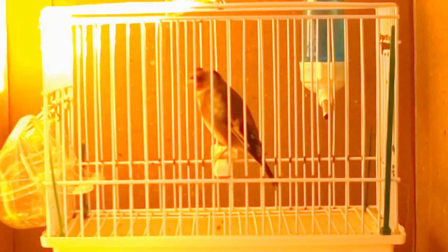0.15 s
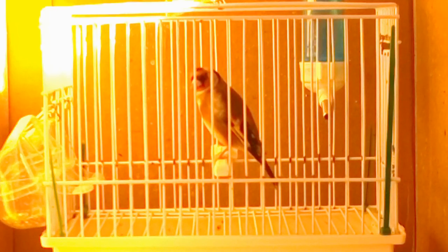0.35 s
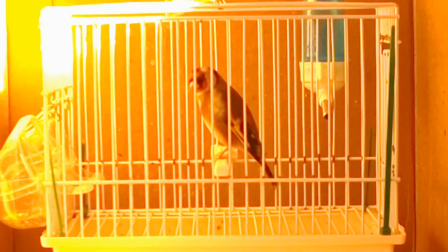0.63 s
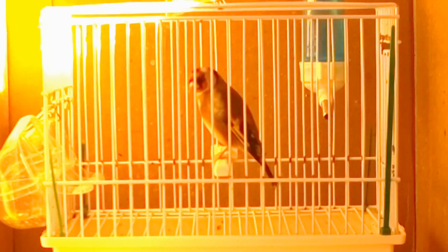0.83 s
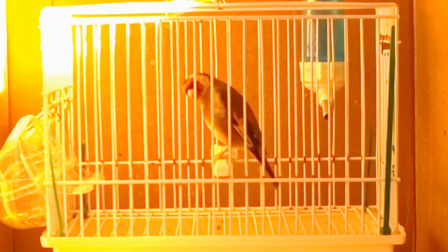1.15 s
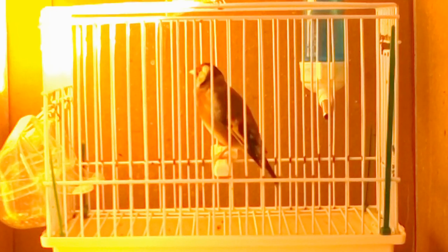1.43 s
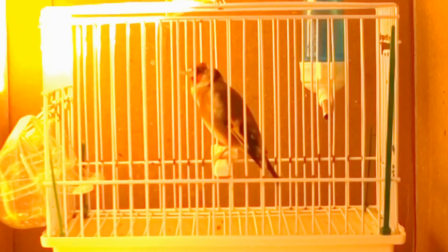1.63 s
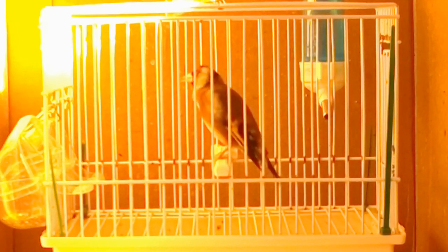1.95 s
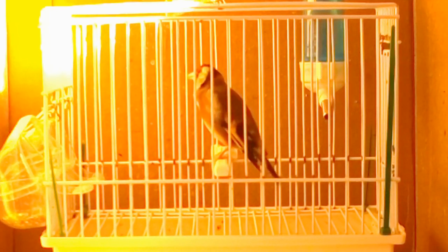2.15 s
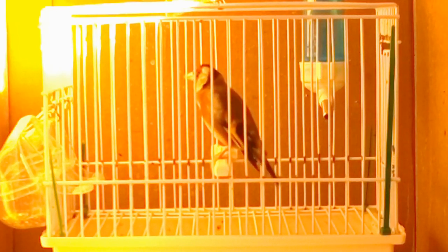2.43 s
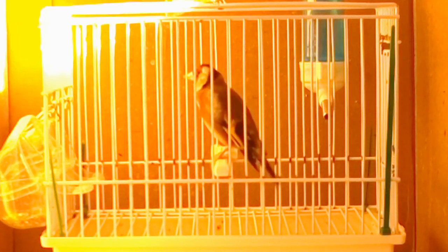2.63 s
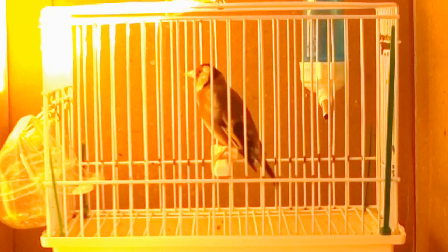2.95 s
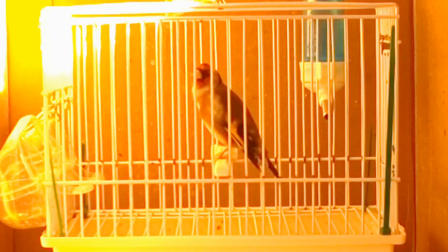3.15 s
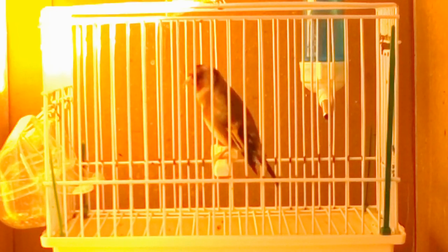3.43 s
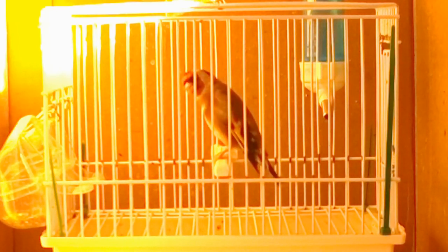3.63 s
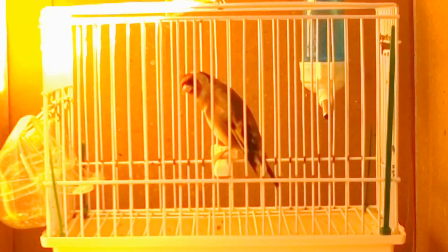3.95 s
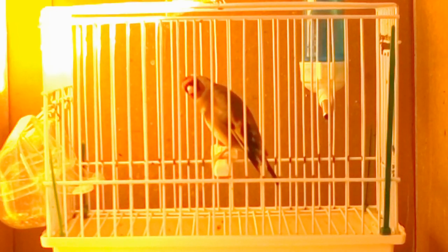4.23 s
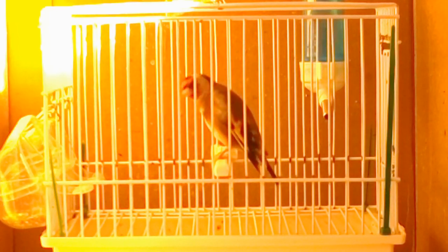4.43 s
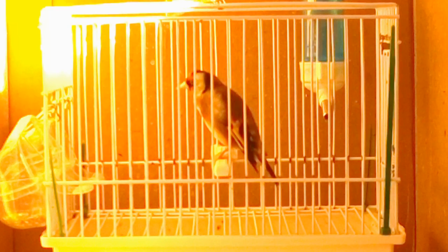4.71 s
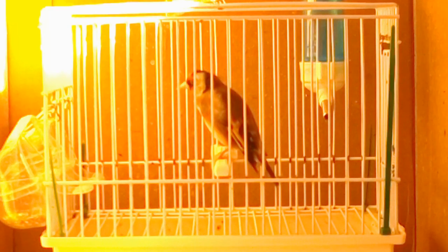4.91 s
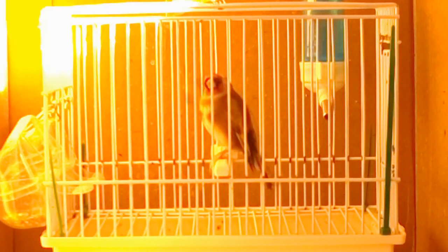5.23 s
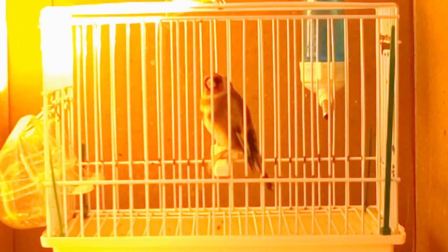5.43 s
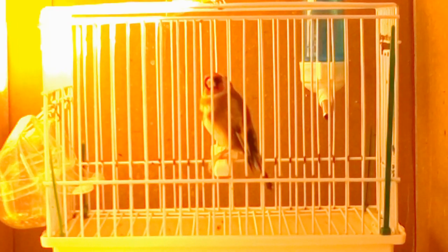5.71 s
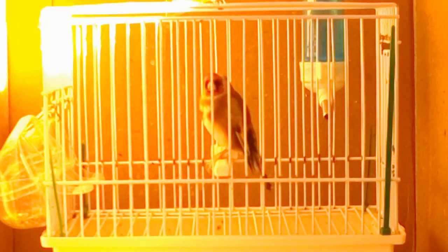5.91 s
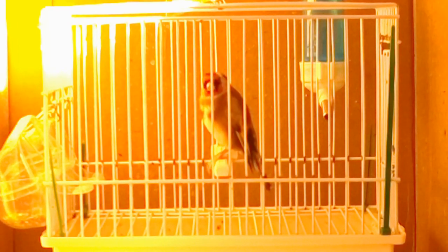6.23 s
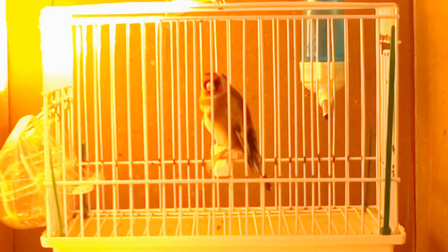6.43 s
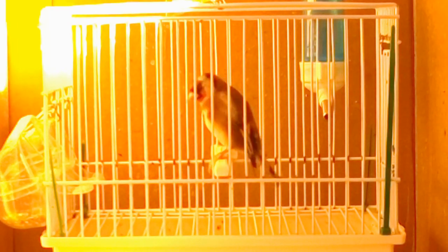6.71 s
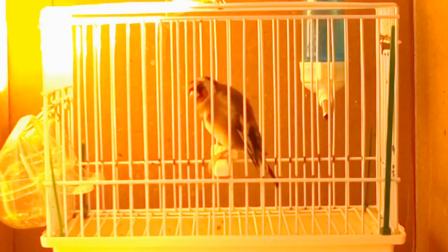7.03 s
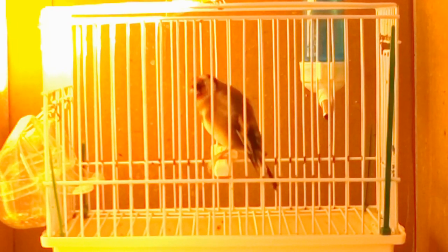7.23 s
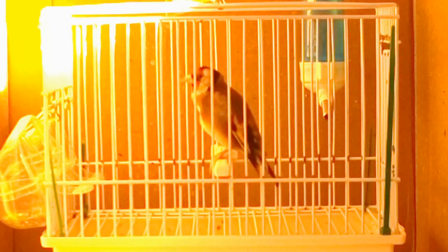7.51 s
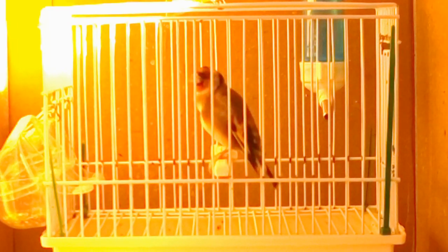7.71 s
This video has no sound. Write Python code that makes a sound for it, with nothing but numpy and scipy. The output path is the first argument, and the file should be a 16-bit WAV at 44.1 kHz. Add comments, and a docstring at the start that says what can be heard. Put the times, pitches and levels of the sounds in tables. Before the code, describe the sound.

A small songbird twitters loudly up close in an echoing room, pausing while distant birds chirp softly over a faint hum.

```python
"""A caged goldfinch sings in a hard-walled room, over steady room noise and a low hum. After a few far-off
chirps it opens with two two-voiced slurs, runs through swoops and upslurs and ends on a falling buzz. In the
pause, distant birds chirp and one whistles a see-saw; then the finch returns with a short phrase. Each syllable
is made of gliding whistles from the syrinx, smeared by the room, and the loudest ones flatten at their peaks."""
import sys
import numpy as np
from scipy import signal
from scipy.fft import rfft, irfft, next_fast_len
from scipy.io import wavfile
from scipy.ndimage import uniform_filter1d, map_coordinates

SR = 44100
rng = np.random.default_rng(int(sys.argv[2]) if len(sys.argv) > 2 else 0)


def bounce(signal):
    """Save signal as a 16-bit WAV file at the path given by the first command-line argument."""
    frames = np.transpose(np.atleast_2d(signal))
    limited = np.clip(frames, -1, 1)
    pcm = np.round(limited * 32767).astype(np.int16)
    wavfile.write(sys.argv[1], SR, pcm)


N = 347067
TREBLE_LIMIT_HZ = 12600
# faint partials of a clean bird whistle: (multiple of the pitch, level [dB])
OVERTONES = [(2, -36.5), (3, -37)]


def amp(db):
    """Decibels to gain."""
    return 10 ** (np.asarray(db) / 20)


def unit(x):
    """Scale to an rms of 1."""
    return x / np.sqrt(np.mean(x ** 2) + 1e-20)


def along(points, hz):
    """Read a curve of (frequency [Hz], value) points on a log frequency axis."""
    freqs, values = np.transpose(points)
    return np.interp(np.log(hz + 1), np.log(freqs + 1), values)


def wobble(rate, size):
    """A smooth random curve with `rate` knots a second."""
    knots = rng.standard_normal(int(size * rate / SR) + 4)
    return map_coordinates(knots, [np.arange(size) * rate / SR])


def ease(u, start, end, bend):
    """From start to end as u goes 0 to 1: a positive bend moves early, a negative one late."""
    return start + (end - start) * np.expm1(-bend * u) / np.expm1(-bend)


def swell(t, attack_s, release_s, depth_db=16):
    """An attack, hold and release envelope in dB."""
    attack = np.clip(1 - t / attack_s, 0, 1) ** 2
    release = np.clip(1 - (t[-1] - t) / release_s, 0, 1) ** 2
    return -depth_db * (attack + release)


def filtered(x, response):
    """Equalise x with a gain that is a function of frequency."""
    size = next_fast_len(N + SR // 2)
    return irfft(rfft(x, size) * response(np.fft.rfftfreq(size, 1 / SR)), size)[:N]


def noise(spectrum):
    """Noise of rms 1, coloured by (frequency [Hz], relative level [dB]) points."""
    white = rng.standard_normal(N)
    return unit(filtered(white, lambda hz: amp(along(spectrum, hz)) * (hz < TREBLE_LIMIT_HZ)))


def add(track, s, sound):
    """Mix a sound into the track at time s."""
    part = track[round(s * SR):][:len(sound)]
    part += sound[:len(part)]


def hum(gain_db=-2, waver=0.68):
    """Steady hum tones, each wavering in level and phase."""
    # hum tones: (frequency [Hz], relative level [dB])
    tones = [(242.2, -43.5), (285.3, -49), (689.1, -47.5), (759.0, -51), (915.2, -47), (969.0, -47),
             (1545, -53), (1599, -59)]
    track, t = np.zeros(N), np.arange(N) / SR
    for hz, db in tones:
        drift = 1 + waver * (wobble(9, N) + 1j * wobble(9, N))
        track += amp(db) * unit(np.real(drift * np.exp(2j * np.pi * hz * t)))
    return amp(gain_db) * track


def room_tone(gain_db=1.0):
    """A dark bed of noise whose level dips briefly about five seconds in."""
    # colour of the bed: (frequency [Hz], relative level [dB])
    spectrum = [(41, -27), (75, -21), (92, -24), (127, -5.5), (195, -8.5), (240, -4), (290, -4.5),
                (560, -5.5), (950, -6.5), (1150, -9), (2500, -17), (5400, -21), (8200, -23), (11000, -35)]
    # its fader curve: (time [s], relative level [dB])
    fader = [(0, -35), (4.95, -35), (5.1, -39.5), (5.3, -37), (5.6, -35.5), (7.87, -35.5)]
    level_db = np.interp(np.arange(N) / SR, *np.transpose(fader))
    return amp(level_db + gain_db) * noise(spectrum)


def rumble(floor_db=-70, bump_s=0.072):
    """A very faint rumble that swells into soft low bumps."""
    # colour of the rumble: (frequency [Hz], relative level [dB])
    spectrum = [(12, -24.5), (28, 1), (50, 2), (80, -6), (130, -17), (400, -120)]
    # bumps: (time [s], level [dB])
    thuds = [(.15, -53), (.42, -50), (2.06, -49), (3.27, -47), (3.358, -49), (3.54, -50), (4.66, -47),
             (6.48, -54)]
    t = np.arange(N) / SR
    bumps = sum(amp(db) * np.exp(-((t - s) / bump_s) ** 2) for s, db in thuds)
    return (amp(floor_db) + bumps) * noise(spectrum)


def room(x, build_s=0.00074):
    """The walls answer with a dense tail that dies sooner in the treble."""
    # reverb decay: (frequency [Hz], time to fall 60 dB [s])
    decay = [(2000, 0.98), (4000, 0.57), (6500, 0.57), (12000, 0.21)]
    # colour of the tail: (frequency [Hz], relative level [dB])
    colour = [(2200, -5), (3100, -5), (4200, 2), (5500, 1.5), (7000, 7), (11000, 1)]
    hz, t, bands = signal.stft(rng.standard_normal(SR), SR, nperseg=256)
    fade_db = along(colour, hz)[:, None] - 60 * t / along(decay, hz)[:, None]
    build_up = 1 - np.exp(-t / build_s)
    tail = signal.istft(bands * amp(fade_db) * build_up, SR, nperseg=256)[1]
    return signal.fftconvolve(x, tail / np.linalg.norm(tail))[:N]


def near_walls(x, wall_db=-13, count=7):
    """The cage tray and the wall behind it send back a few quick reflections."""
    echoes = np.zeros(N)
    for delay_s in rng.uniform(.002, .022, count):
        add(echoes, delay_s, x)
    return amp(wall_db) * echoes / np.sqrt(count)


def syrinx(hz, db, partials, jitter=0.0029, shimmer_db=2.23, edge_s=.003):
    """A bird's voice: a slightly unsteady whistle with weaker partials and soft ends."""
    n = len(hz)
    phase = 2 * np.pi * np.cumsum(hz * (1 + jitter * wobble(425, n))) / SR
    upper = sum(amp(level) * np.sin(k * phase) * (k * hz < SR / 2) for k, level in partials)
    gain = amp(db + shimmer_db * wobble(273.6, n))
    ends = np.clip(np.minimum(np.arange(n), np.arange(n)[::-1]) / (edge_s * SR), 0, 1)
    return (np.sin(phase) + upper) * gain * np.sin(np.pi / 2 * ends) ** 2


def far_chirps(foot=0.62, bend=6, droop=.2, rasp=0.056, crest=0.37, taper_db=-16):
    """Each distant chirp scoops up toward its top pitch and droops; rasp shakes the pitch."""
    # chirps: (time [s], relative level [dB], top pitch [Hz], length [s])
    calls = [ (0.4, -30, 3735, .045), (0.636, -26.5, 3340, 0.028), (0.758, -28, 3390, 0.0324),
             (.89, -31.5, 3350, 0.0354), (1.261, -29.5, 3500, 0.028), (4.491, -29, 3960, .02),
             (4.552, -27.5, 3740, 0.059), (4.678, -30.5, 3430, 0.063), (4.853, -27.5, 4640, 0.021),
             (6.089, -25.5, 4540, .025), (6.212, -33, 3470, .035), (6.385, -28, 3440, 0.027),
             (6.49, -27.5, 3390, 0.0295), (6.613, -29.5, 3420, .033), (5.967, -48, 8000, .04),
             (6.14, -43.5, 8030, 0.035), (6.32, -47, 8040, .045), (6.492, -42, 7230, .04),
             (7.088, -38, 3970, 0.034), (7.26, -36.5, 4170, 0.033), ]
    track = np.zeros(N)
    for s, db, top_hz, length_s in calls:
        u = np.linspace(0, 1, round(length_s * SR))
        contour = ease(u, foot, 1, bend) - droop * u ** 4
        hz = top_hz * contour * (1 + rasp * wobble(696, len(u)))
        add(track, s, syrinx(hz, db + taper_db * (u - crest) ** 2, OVERTONES))
    return track


def seesaw(gain_db=2, period_s=.179, length_s=0.062, droop=0.0276, low_ratio=.763, low_db=1.5):
    """A distant bird alternates pure high and low notes, each sagging as it swells and fades."""
    # two lone opening notes: (time [s], pitch [Hz], relative level [dB])
    openers = [(5.283, 4450, -40), (5.45, 3745, -42)]
    # bouts: (start [s], end [s], first high note [Hz], last high note [Hz], low note's lag [s],
    # relative level [dB])
    bouts = [(5.639, 6.62, 5537, 5190, 0.089, -40.5), (6.677, 6.95, 6080, 6040, 0.029, -42),
             (7.056, 7.32, 5410, 5510, 0.025, -43.5)]
    notes = list(openers)
    for start, end, first_hz, last_hz, lag, db in bouts:
        beats = np.arange(start, end, period_s)
        high_hz = ease(np.linspace(0, 1, len(beats)), first_hz, last_hz, bend=-2.85)
        for s, hz in zip(beats, high_hz):
            notes += [(s, hz, db), (s + lag, hz * low_ratio, db + low_db)]
    track, u = np.zeros(N), np.linspace(0, 1, round(length_s * SR))
    sag = 1 + droop * (1 - u) ** 4
    arch_db = gain_db - 30 * (u - .4) ** 2
    for s, hz, db in notes:
        add(track, s, syrinx(hz * sag, db + arch_db, partials=[]))
    return track


def treble_hiss(voice, hiss_db=-35, smooth_s=.006):
    """A faint high hiss rises and falls with the loudness of the song."""
    strength = np.sqrt(np.abs(uniform_filter1d(voice ** 2, round(SR * smooth_s))))
    return amp(hiss_db) * strength * noise([(3000, -21.0), (8000, 3), (11500, 2)])


def glide(length_s, start_hz, end_hz, bend, db, attack_s, release_s, partials):
    """One whistle that eases from one pitch to another."""
    t = np.arange(0, length_s, 1 / SR)
    hz = ease(t / length_s, start_hz, end_hz, bend)
    return syrinx(hz, db + swell(t, attack_s, release_s), partials)


def buzz(start_s=3.692, length_s=.251, sweeps_per_s=95, db=-6.5, shut_db=-19, top_db=-6.0):
    """The finch's buzz: rapid upward sweeps that sink in pitch and die away."""
    track, t = np.zeros(N), np.arange(0, length_s, 1 / SR)
    # foot and top of the sweeps, each: (first pitch [Hz], last pitch [Hz], bend)
    foot = (5800, 2590, 1.2)
    top = (6800, 4300, -2)
    low_hz, high_hz = ease(t / length_s, *foot), ease(t / length_s, *top)
    cycle = (t * sweeps_per_s + .05 * wobble(40, len(t))) % 1
    sweep = np.interp(cycle, [0, .2, .85, 1], [.05, 0, 1, .05])
    # the voice is shut while the pitch falls back for the next sweep
    shut = np.interp(cycle, [0, .1, .34, .7, .88, 1], [1, .4, 0, 0, 1, 1])
    envelope_db = db + swell(t, attack_s=.003, release_s=0.088, depth_db=6.88)
    flutter_db = shut_db * shut + top_db * sweep ** 2 + 0.5 * wobble(105, len(t))
    hz = low_hz + (high_hz - low_hz) * sweep
    add(track, start_s, syrinx(hz, envelope_db + flutter_db, partials=[(2, -28)]))
    return track


def swoops(top_hz=8150, break_hz=6600, lead_db=-11, dive_db=-2.5, landing_db=0.7):
    """Each dive starts softly, opens up halfway, then breaks into a loud drop onto a held note."""
    # the finch's run of swoops: (time [s], relative level [dB], dive length [s], landing pitch [Hz])
    run = [(1.942, -2.5, 0.026, 5480), (2.120, -.5, 0.025, 5790), (2.309, -1.5, 0.028, 5610),
           (2.501, -0.5, .027, 5330), (2.690, -0.5, 0.023, 5225)]
    track = np.zeros(N)
    for s, db, dive_s, landing_hz in run:
        t = np.arange(0, dive_s, 1 / SR)
        soft_lead = (1 - np.tanh((t / dive_s - 0.55) / .1)) / 2
        level_db = db + dive_db + lead_db * soft_lead + swell(t, attack_s=.007, release_s=0.0019)
        dive_hz = ease(t / dive_s, top_hz, break_hz, bend=0.388)
        add(track, s, syrinx(dive_hz, level_db, OVERTONES))
        landing = glide(length_s=.03, start_hz=break_hz, end_hz=landing_hz, bend=7.5, db=db + landing_db,
                        attack_s=0.0005, release_s=0.0094, partials=OVERTONES)
        add(track, s + dive_s, landing)
    return track


def syllables():
    """Each finch syllable is one to four glides of the two-sided syrinx, transposed and stretched."""
    # the song: (time [s], syllable, relative level [dB], pitch ratio, length ratio)
    song = [ (1.374, "squeak", -32.5, .92, 1.05), (1.393, "peep", -28, 1.1, 1.2),
            (1.431, "rise", -12.5, 1.002, 0.98), (1.457, "glide", -15, 0.94, .85),
            (1.499, "slur", -17, 1.044, 1.05), (1.668, "squeak", -25.5, 1.03, 0.91),
            (1.670, "peep", -21.5, 1.05, 1.04), (1.713, "rise", -15.5, 1.04, 1.2),
            (1.730, "glide", -11, 1, 1.2), (1.782, "slur", -12, 1.05, 1.02),
            (2.034, "step", -6, 1.008, 1.02), (2.222, "step", -6.5, 1.01, 0.97),
            (2.407, "step", -8, 1.002, 1.1), (2.602, "step", -8, 1.004, 1.09),
            (2.808, "creep", -16, 0.99, 1.18), (2.883, "hook", -2, 0.98, 1.03),
            (2.906, "pip", -2, 1.015, 1), (2.985, "creep", -13, 0.98, 1.12), (3.050, "hook", -2, .985, .95),
            (3.075, "pip", -0.5, 1.012, 1), (3.165, "creep", -13, 0.94, 1),
            (3.231, "hook", -0.5, 0.98, 1.12), (3.246, "scoop", -6.5, 1.005, 1.27),
            (3.351, "creep", -14.5, 0.97, 0.99), (3.417, "hook", 0, 0.988, 0.94),
            (3.435, "scoop", -6.5, 1.027, 1.31), (3.555, "flick", -5.5, 1.025, 1.08),
            (3.639, "slide", -14.5, 0.98, 0.94), (7.341, "tsee", -3, 1.006, 0.86),
            (7.342, "under", -24, 1.01, 1), (7.435, "lift", -5, 1.018, 0.99),
            (7.547, "lift", -5.5, .98, .92), (7.746, "zee", -1.5, 1.001, 0.98),
            (7.747, "under", -18, 1.06, 0.77), (7.843, "lift", -5, 0.95, 0.72), ]
    # glides of each syllable: (delay [s], length [s], start pitch [Hz], end pitch [Hz], bend,
    # relative level [dB], attack [s], release [s])
    shapes = { "squeak": [(0, 0.053, 2050, 2800, 1.3, -1.5, .02, 0.0049)],
              "peep": [(0, 0.038, 3430, 3980, 2, -0.5, 0.0089, 0.014)],
              "rise": [(0.00024, 0.032, 2720, 3520, 1.92, -1, 0.0052, 0.014)],
              "glide": [(0, 0.0442, 4780, 4350, 1.42, -0.5, .015, 0.016)],
              "slur": [(0, .011, 4550, 7070, 1.84, -14, 0.0037, .002),
              (.009, .036, 7160, 4460, -0.95, -5, 0.038, 0.004),
              (.01, .026, 6000, 3750, -1.5, 0, .02, .003),
              (.033, .055, 3850, 2135, 1.7, 0.5, 0.021, 0.065)],
              "step": [(0, 0.025, 2650, 3470, 2.07, -0.5, 0.0069, 0.026),
              (.027, 0.0352, 3670, 4479, 7.9, 0.5, .018, 0.0054)],
              "creep": [(0, 0.0266, 2295, 2580, .3, -11, 0.01, .003),
              (.023, 0.0313, 2530, 3457, 2.26, -0.5, 0.009, 0.018)],
              "hook": [(0, .011, 7000, 5510, 0.84, 1, 0.0069, 0.0054),
              (.009, 0.015, 5590, 5430, 2.6, -3.5, .002, .008)],
              "pip": [(0, 0.0233, 3480, 4000, 6, 0, 0.0092, 0.0059)],
              "scoop": [(0.0016, 0.0373, 3000, 3990, 5.35, 0.5, 0.016, .014)],
              "flick": [(0, 0.014, 2320, 3840, -1.5, -13, 0.005, 0.0013),
              (.009, 0.017, 3720, 5410, 3.5, 3, 0.0026, 0.0086)],
              "slide": [(0, 0.037, 8470, 7880, -1.9, -7, .01, .002),
              (.02, 0.04, 8270, 6270, 1.5, 0, 0.0087, 0.02)],
              "tsee": [(0, 0.018, 5300, 6750, 6.5, -22, 0.0046, .002),
              (.019, 0.0348, 7060, 5910, 1, -2, 0.019, 0.0048)],
              "zee": [(0, .027, 4950, 6850, 7.8, -8, 0.0062, .002),
              (.025, .033, 6780, 6280, 1.8, -2, 0.011, 0.0069)],
              "under": [(0, 0.025, 5600, 5230, -1, 0.5, .007, .01),
              (.028, .02, 5120, 4860, 1.6, 5.5, .004, .007)],
              "lift": [(0, .031, 3090, 4150, 2.2, 0.5, 0.018, .01),
              (.029, 0.015, 4090, 4455, 3, 0, 0.0057, 0.0073)], }
    # partials of the reedier syllables: (multiple of the pitch, level [dB])
    reedy = {"squeak": [(2, -5.5)], "under": [(2, -13.5)], "tsee": [(2, -24)], "zee": [(2, -18)],
             "glide": [(2, -27.5)]}
    track = np.zeros(N)
    for s, name, level_db, pitch, stretch in song:
        for delay, length, start, end, bend, db, attack, release in shapes[name]:
            whistle = glide(length * stretch, start * pitch, end * pitch, bend, level_db + db,
                            attack * stretch, release * stretch, reedy.get(name, OVERTONES))
            add(track, s + delay * stretch, whistle)
    return track


def scene(direct_db=-1.14, wet_db=-4, far_direct_db=-5, far_wet_db=-1):
    """The finch is close; the other birds arrive mostly by way of the walls."""
    voice = syllables() + swoops() + buzz()
    close_sound = voice + treble_hiss(voice)
    others = far_chirps() + seesaw()
    near = amp(direct_db) * close_sound + near_walls(close_sound) + amp(wet_db) * room(close_sound)
    far = amp(far_direct_db) * others + amp(far_wet_db) * room(others)
    background = hum() + room_tone() + rumble()
    return (background + far + near)[None]


def record(dry, ceiling_db=-0.6, hardness=24, splash_db=-10, top_hz=16000):
    """The microphone misses the high treble; the loudest whistles flatten at their peaks and splash faintly
    into that band."""
    heard = filtered(dry[0], lambda hz: hz < TREBLE_LIMIT_HZ)
    clipped = heard / (1 + np.abs(heard / amp(ceiling_db)) ** hardness) ** (1 / hardness)

    def treble_cut(hz):
        shelf = np.where(hz < TREBLE_LIMIT_HZ, 1, amp(splash_db))
        return shelf / (1 + (hz / top_hz) ** 60)

    return filtered(clipped, treble_cut)[None]


dry = scene()
out = record(dry)
bounce(out)
```